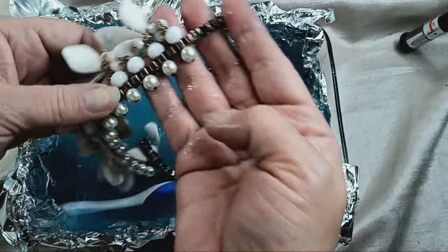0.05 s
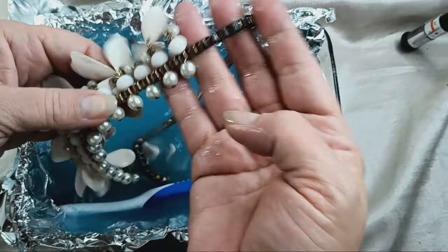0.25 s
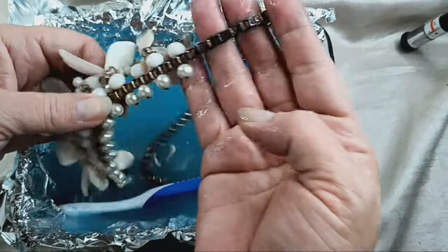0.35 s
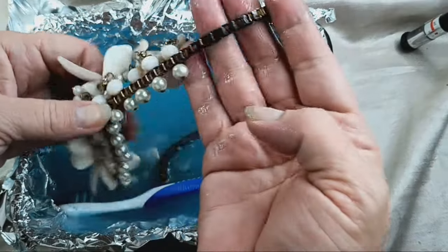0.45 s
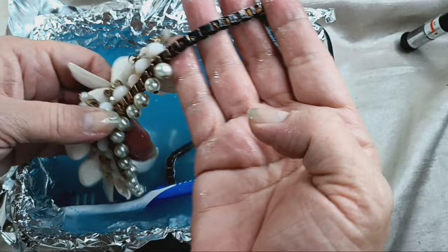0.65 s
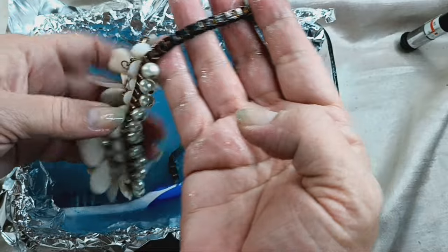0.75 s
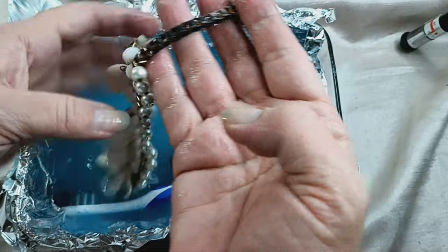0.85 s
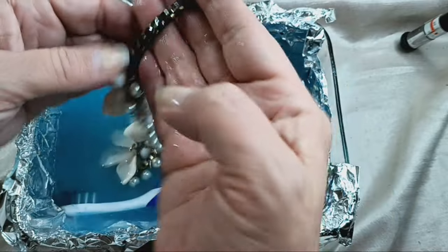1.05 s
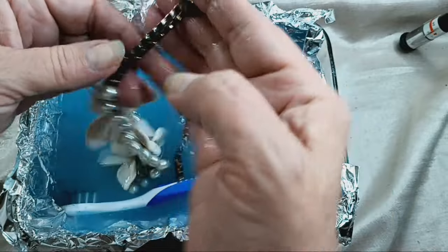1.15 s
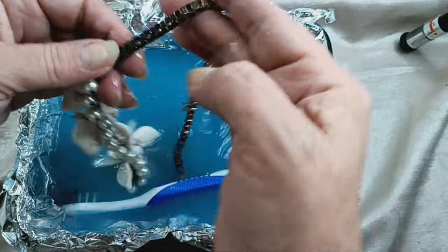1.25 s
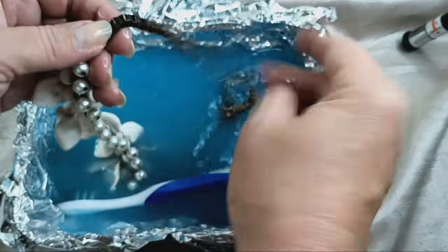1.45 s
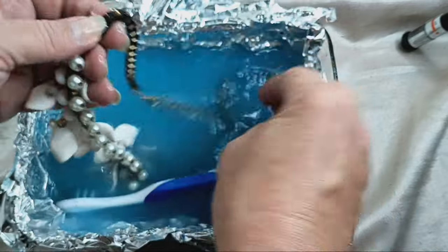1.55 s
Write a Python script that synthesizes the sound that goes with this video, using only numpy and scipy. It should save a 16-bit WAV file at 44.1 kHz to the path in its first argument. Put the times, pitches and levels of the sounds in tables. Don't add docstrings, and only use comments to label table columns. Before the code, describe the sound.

Beads and metal links tick sharply against each other, with wet rubbing and faint gurgles, up close

```python
import sys
import numpy as np
from scipy import signal
from scipy.fft import rfft, irfft
from scipy.io import wavfile
from scipy.ndimage import uniform_filter1d

SR = 44100
rng = np.random.default_rng(int(sys.argv[2]) if len(sys.argv) > 2 else 0)


def level_to_linear(level):
    exponent = np.asarray(level, float) / 20
    return 10 ** exponent


def unload_audio(sound):
    columns = np.transpose(np.atleast_2d(sound))
    steps = np.round(np.clip(columns, -1, 1) * 32767)
    wavfile.write(sys.argv[1], SR, steps.astype(np.int16))


N = 70560

# start in seconds, peak level in dB, pitch in Hz,
# left minus right in dB, body (below the bright ticking) in dB. The next two tables are alike.
FIRST_TURN_KNOCKS = [(0.0526, -32.5, 5600, -30, -6), (0.068, -32.5, 5900.0, -20, 8),
                     (0.0861, -26.5, 9900, -26, -12), (0.1051, -32.5, 6340, -21, -9),
                     (0.147, -27.5, 11070, -25, -22), (0.1793, -21, 10300, -40, -26),
                     (0.1924, -23.5, 9540, -30, -10), (0.21, -26, 9400, -33, -19),
                     (0.2187, -13.5, 7240, -26, -7), (0.2334, -15, 9840, -3, 0.5),
                     (0.2408, -23, 6350, -10, 2), (0.2465, -15.5, 10540, -2, 0), (0.2606, -8, 8000, -11, 1),
                     (0.278, -18, 6240, -5, -8), (0.2849, -16.5, 6600, 5, -5.5),
                     (0.2997, -15.5, 6600, -8, -7), (0.3582, -14.5, 9760, -12.5, -0.5),
                     (0.4052, -12, 11060, -7, 2.5), (0.4095, -11, 9970, -18, 4.5),
                     (0.4121, -15, 9950, -9.5, 4), (0.4325, -35, 9500.0, 0, 5),
                     (0.464, -34, 5900.0, -3.5, -3)]
# start [s], peak level [dB], pitch [Hz], left minus right [dB], body [dB].
SECOND_TURN_KNOCKS = [(0.5114, -14.5, 9040, -8.5, -3.5), (0.5259, -23, 9440, -25, -1),
                      (0.6, -36.5, 10100, -27, -17), (0.6133, -30, 5100.0, -23, -4),
                      (0.6235, -17, 9730, -14, -7), (0.6462, -15, 9600, -13.5, 2),
                      (0.6514, -10.5, 8800, -15, -14), (0.6665, -13, 7770, -7, 2.5),
                      (0.7063, -11.5, 7520, -12.5, -7.5), (0.7395, -14.5, 9900, -9, 4.5),
                      (0.7561, -15, 9730, -16, -2), (0.7668, -21.5, 10100, -12, 0),
                      (0.806, -21, 5300, -5, 1), (0.8089, -18.5, 10400, -10.5, 11.5),
                      (0.8293, -25, 6400, -1, 16), (0.896, -15.5, 9660, -11, -9),
                      (0.918, -18, 6400, -2, -8), (0.9232, -5.5, 9090, -4, -0.5),
                      (0.9326, -13.5, 6720, 6.5, -19), (0.9422, -11, 6400, -4, -30),
                      (0.949, -15, 9350, -3.5, -11), (0.9704, -19, 6200, 1, -12)]
# start [s], peak level [dB], pitch [Hz], left minus right [dB], body [dB].
LETTING_GO_KNOCKS = [(0.9611, -3, 10480, -10, 0), (1.0079, -27.5, 8350, 4.5, -7),
                     (1.0309, -17, 9600, -11.5, -8), (1.0523, -18.5, 9850, -1, 2),
                     (1.057, -10, 11800, -30, -23), (1.0654, -17.5, 8860, -0.5, 7.5),
                     (1.0778, -19.5, 11300, -6, -9), (1.0934, -17.5, 9900, -10, 0.5),
                     (1.1235, -21, 10140, -14, -6), (1.154, -17, 11700, -15.5, -11),
                     (1.163, -18, 9370, -7, 6.5), (1.1968, -25, 9300, -17, 3),
                     (1.2267, -26.5, 10160, -12, 2.5), (1.254, -33.5, 9150, -4, -8),
                     (1.2872, -27.5, 6500, -2, 6.5), (1.3205, -17, 9560, -4, 2),
                     (1.406, -31, 6800, -1, 11.5), (1.4463, -35.5, 8900, -23, -3.5),
                     (1.517, -19, 9630, -13, -26)]
# start in seconds, peak level in dB, pitch in Hz,
# left minus right in dB.
LIGHT_TICKS = [(0.0165, -42, 10800, -24), (0.0426, -35, 10400, -23), (0.0633, -27.5, 9900, -36),
               (0.0768, -34, 10600, -21), (0.1664, -39, 9900, -29), (0.2232, -22, 10500, -25),
               (0.2307, -23, 10300, -13), (0.269, -24, 6100, 3), (0.2933, -24, 6640, -4),
               (0.3078, -22.5, 7800, -4.5), (0.3155, -29, 6800, -6), (0.323, -31.5, 6500, -0.5),
               (0.38, -39, 10100, -3), (0.3958, -38, 9900, -7), (0.4016, -21.5, 8100, -14),
               (0.534, -34.5, 8540, -1), (0.5685, -46, 9800, -13), (0.6312, -33, 9600, -3),
               (0.6361, -27, 10500, -10), (0.6392, -24, 10800, -23), (0.6594, -26, 8800, -9),
               (0.6754, -29, 7440, 4), (0.6847, -26, 8200, -15), (0.6954, -35, 6000, -5),
               (0.7223, -42, 9800, -8), (0.731, -28.5, 9900, -4), (0.7505, -30, 9900, -5),
               (0.7801, -21.5, 10500, -8), (0.7903, -31, 10400, -10), (0.8372, -24.5, 6500, -2.5),
               (0.8418, -26.5, 9000, -2), (0.8508, -26.5, 7800, -3), (0.876, -41, 9000, -14),
               (0.9933, -25.5, 9300, -7), (1.0438, -27, 10700, -10), (1.0715, -13, 10050, -9),
               (1.1914, -30.5, 9830, -3), (1.218, -29, 10500, -18), (1.242, -43, 7100, -16),
               (1.2606, -41, 9000, 5.5), (1.2784, -33, 4700, -10), (1.2982, -30.5, 5830, 2),
               (1.3292, -33.5, 7300, -4), (1.3657, -42.5, 10700, -20), (1.381, -40, 9900, -17),
               (1.4297, -38.5, 9800, -10), (1.4721, -33, 9600, -14), (1.5043, -44, 8650, -6)]
# time in seconds, level of the fine rattle in dB, wetness in dB.
HAND_MOTION = [(0, -56, -3.5), (0.113, -52.5, 11), (0.166, -60, 5), (0.223, -37.5, 1), (0.311, -43.5, -10),
               (0.351, -55, 6), (.42, -43, -14), (0.487, -59.5, 3), (0.533, -50, 0.5), (0.588, -68.5, -8),
               (0.638, -42.5, -19), (.79, -44, -2), (0.862, -48.5, 16.5), (.94, -40.5, 2),
               (1.072, -40, 1.5), (1.246, -52.5, -4), (1.439, -52.5, 6), (1.6, -59, 11.5)]
# frequency in Hz, gain in dB.
RIGHT_PORT = [(900, -37.5), (2500, -15.5), (5000, -5), (6600, -4), (7800, -4.5), (9900, 2.5), (12400, -3),
              (15800, -13.5)]
# frequency in Hz, gain in dB.
LEFT_PORT = [(800, -47.5), (2500, -24), (5000, -13.5), (6500, -7), (7700, -10), (8650, -4), (10000, -24),
             (13500, -30)]
# frequency in Hz, gain in dB.
WATER_COLOUR = [(500, -55), (1000, -27), (2800, -8), (6000, -23)]
# frequency in Hz, width in Hz, level in dB.
BATH_RESONANCES = [(1257, 300, 1), (1565, 230, 0.5), (2264, 200, 3.5)]
# start in seconds, pitch in Hz, level in dB, ring in seconds.
BUBBLES = [
    (.1, 1560, -59.5, 0.18),
    (0.753, 2640, -37, 0.014),
    (0.811, 1443, -42, 0.027),
    (.863, 2173, -36, 0.084),
    (.878, 1997, -36, 0.046),
    (.878, 1043, -54, 0.048),
    (1.45, 1740, -42.5, 0.012),
    (1.531, 1624, -61, 0.11),
]
# frequency in Hz, gain in dB.
ROOM_COLOUR = [(25, -0.5), (70, 3), (160, -5.5), (400, -16), (1500, -13.5), (4000, -40.5), (9500, -23),
               (13000, -54)]
# frequency in Hz, level in dB.
HUM_TONES = [(64.6, -84.5), (118.4, -94), (145.3, -89.5)]
# start in seconds, level in dB.
FAR_COOS = [
    (0.999, -72.5),
    (1.088, -74.5),
    (1.2, -78),
    (1.306, -74.5),
]

GRAIN = 4096
LEFT_LAG_S = 0.0012
RUB_TOP_HZ = 11800


def response(points, size):
    p = np.array(points, float)
    hz = np.maximum(np.arange(size // 2 + 1) * SR / size, 1)
    db = np.interp(np.log(hz), np.log(p[:, 0]), p[:, 1])
    cepstrum = irfft(db * np.log(10) / 20, size)
    cepstrum[1:size // 2] *= 2
    cepstrum[size // 2 + 1:] = 0
    return np.exp(rfft(cepstrum))


def colour(x, points):
    size = x.shape[-1]
    return irfft(rfft(x) * response(points, size), size)


def unit(x):
    return x / np.sqrt(np.mean(x ** 2))


def fade(t, t60):
    return (t >= 0) * np.exp(-np.log(1000) * np.maximum(t, 0) / t60)


def walk(rate):
    k = int(SR / rate)
    return unit(uniform_filter1d(uniform_filter1d(rng.standard_normal(N), k), k))


def add(out, grains, times):
    starts = np.round(np.asarray(times) * SR).astype(int)
    for k, s in enumerate(starts):
        n = min(grains.shape[2], N - s)
        out[:, s:s + n] += grains[:, k, :n]


def strike(hz, chance, noise):
    t = np.arange(GRAIN) / SR
    crack_t60, bead_t60, link_t60, contact_s = 0.003, 0.0045, 0.011, 0.0004
    hit = noise * fade(t, crack_t60)
    hit = hit + level_to_linear(-0.5) * np.sin(2 * np.pi * hz[:, None] * t) * fade(t, bead_t60)
    for k in range(4):
        link_hz = 3000 + 10500 * chance[:, k, None]
        ring = fade(t, link_t60 * (0.21 + chance[:, 4 + k, None]))
        hit = hit + level_to_linear(-11) * np.sin(2 * np.pi * link_hz * t) * ring
    hit[:, 6] += 1.1
    return hit * (1 - fade(t, contact_s))


def ticks(hz, body_db, top_db):
    t = np.arange(GRAIN) / SR
    bins = np.arange(GRAIN // 2 + 1) * SR / GRAIN
    count = len(hz)
    chance = rng.random((count, 16))
    noise = rng.standard_normal((count, 3, GRAIN))
    bounces = 1
    for k in range(3):
        gap_s = 0.0022 * (0.1118 + chance[:, 8 + k, None])
        bounce_db = -7 - 6.7 * chance[:, 11 + k, None]
        bounces = bounces + level_to_linear(bounce_db) * np.exp(-2j * np.pi * bins * gap_s)
    source = rfft(strike(hz, chance, noise[:, 0])) * bounces
    body = level_to_linear(body_db[:, None] / (1 + (bins / 4770) ** 6))
    body = body * level_to_linear(top_db[:, None] * (1 - 1 / (1 + (bins / RUB_TOP_HZ) ** 10)))
    out = []
    for c, (port, dish_db, lag) in enumerate([(LEFT_PORT, -13, LEFT_LAG_S), (RIGHT_PORT, -19, 0)]):
        dish = level_to_linear(dish_db) * rfft(noise[:, 1 + c] * fade(t - 0.0006, 0.05))
        late = np.exp(-2j * np.pi * bins * lag * (0.88 + 0.2 * chance[:, 15, None]))
        grain = irfft((source + dish) * body * late * response(port, GRAIN), GRAIN)
        loudest = uniform_filter1d(grain ** 2, size=30, axis=1).max(axis=1, keepdims=True)
        out.append(grain / np.sqrt(2 * loudest))
    return np.array(out)


def knocks():
    light = [tuple(row) + (-3,) for row in LIGHT_TICKS]
    rows = [tuple(row) for table in (FIRST_TURN_KNOCKS, SECOND_TURN_KNOCKS, LETTING_GO_KNOCKS) for row in table]
    s, db, hz, left_db, body_db = np.array(rows + light, float).T
    top_db = 0.4 * (db + 19.5)
    port_db = np.array([db + left_db, db])
    out = np.zeros((2, N))
    add(out, ticks(hz, body_db, top_db) * level_to_linear(port_db)[:, :, None], s)
    return out


def rattle(count=600):
    chance = rng.random((count, 4))
    shapes = ticks(5000 + 6500 * rng.random(40), *np.zeros((2, 40)))[:, :, :1500]
    size = level_to_linear(-3.5 * np.log(1 - 0.93 * chance[:, 1]))
    side = level_to_linear(np.array([-7.5 + 8 * (chance[:, 3] - 0.5), 0 * size]))
    grains = shapes[:, (chance[:, 2] * 40).astype(int)] * (size * side)[:, :, None]
    out = np.zeros((2, N))
    add(out, grains, chance[:, 0] * (N - 1) / SR)
    usual = np.median(np.sqrt(uniform_filter1d(out[1] ** 2, 400)))
    return level_to_linear(-0.5) * out / usual + level_to_linear(-3.5) * hiss()


def hiss():
    shared, own = np.zeros((2, N))
    for hz in 2000 * np.sqrt(2) ** np.arange(7):
        sos = signal.butter(2, [hz / 1.19, hz * 1.19], "band", fs=SR, output="sos")
        near, far = level_to_linear(5 * walk(61)) * signal.sosfilt(sos, rng.standard_normal((2, N)))
        shared, own = shared + near, own + far
    left = 1.6 * np.roll(shared, int(LEFT_LAG_S * SR)) + 0.45 * own
    ports = np.array([colour(left, LEFT_PORT), colour(shared, RIGHT_PORT)])
    return level_to_linear(3 * walk(100)) * unit(ports)


def water():
    grainy = rng.standard_normal(N) * level_to_linear(4 * walk(110))
    shared = unit(colour(grainy, WATER_COLOUR)) * level_to_linear(2.0)
    for hz, width, db in BATH_RESONANCES:
        b, a = signal.iirpeak(hz, hz / width, fs=SR)
        ringing = unit(signal.filtfilt(b, a, rng.standard_normal(N)))
        shared = shared + level_to_linear(db + 3 * walk(40)) * ringing / 3
    late = np.roll(shared, int(LEFT_LAG_S * SR))
    left_own = unit(colour(rng.standard_normal(N), WATER_COLOUR))
    return level_to_linear(-17.5) * np.array([0.41 * late + 0.48 * left_own, shared])


def bubbles():
    s, hz, db, ring = np.array(BUBBLES).T[:, :, None]
    t = np.arange(GRAIN) / SR

    def heard(u):
        tone = np.sin(2 * np.pi * hz * u * (1 + 0.01 * u / ring))
        return level_to_linear(db) * tone * fade(u, 2 * ring) * (1 - fade(u, 0.016))

    out = np.zeros((2, N))
    add(out, np.array([level_to_linear(-6.5) * heard(t - LEFT_LAG_S), heard(t)]), s[:, 0])
    return out * level_to_linear(2.5 * walk(200))


def room():
    t = np.arange(N) / SR
    mid, side = colour(rng.standard_normal((2, N)), ROOM_COLOUR)
    side = colour(side, [(60, -10.5), (250, 2.0)])
    out = level_to_linear(-76) * unit(mid + side * np.array([[1], [-1]]))
    for hz, db in HUM_TONES:
        tone = np.sin(2 * np.pi * hz * (t + 0.00033 * walk(9)))
        out = out + np.sqrt(2) * level_to_linear(db + 5.9 * walk(6.0)) * tone
    coo_hz, coo_width_hz, coo_s = 624, 33, 0.068
    b, a = signal.iirpeak(coo_hz, coo_hz / coo_width_hz, fs=SR)
    coo = unit(signal.lfilter(b, a, rng.standard_normal(N)))
    for s, db in FAR_COOS:
        swell = np.sin(np.pi * np.clip((t - s) / coo_s, 0, 1))
        out = out + level_to_linear(db) * swell * coo * level_to_linear(np.array([[-4], [0]]))
    return out


def scene():
    t = np.arange(N) / SR
    s, motion_db, wet_db = np.array(HAND_MOTION).T
    motion = np.interp(t, s, motion_db)
    wetness = np.interp(t, s, wet_db)
    rub = signal.sosfilt(signal.butter(2, RUB_TOP_HZ, fs=SR, output="sos"), rattle())
    bed = level_to_linear(motion) * rub + level_to_linear(motion + wetness) * water() + bubbles()
    left_opens_s = 0.232
    muffle = level_to_linear(np.array([-20 * (t < left_opens_s), 0 * t]))
    return knocks() + bed * muffle + room()


def low_pass(x):
    return signal.sosfilt(signal.butter(12, 17150, fs=SR, output="sos"), x)


def record(dry):
    def cut(hz):
        return signal.sosfiltfilt(signal.ellip(6, 0.1, 40, hz, fs=SR, output="sos"), dry)

    def soft(gate):
        return uniform_filter1d(1.0 * gate, size=256)

    dull, usual, open_top = cut(11900), cut(15900), cut(16700)
    slow = uniform_filter1d(dry ** 2, size=1024)
    fast = uniform_filter1d(dry[1] ** 2, size=128)
    attack = fast > 4 * uniform_filter1d(slow[1], size=2048)
    lively = slow > level_to_linear(2 * -53)
    out = dull + soft(lively) * (usual - dull) + soft(attack) * (open_top - usual)
    return low_pass(out)


dry = scene()
out = record(dry)
unload_audio(out)
```